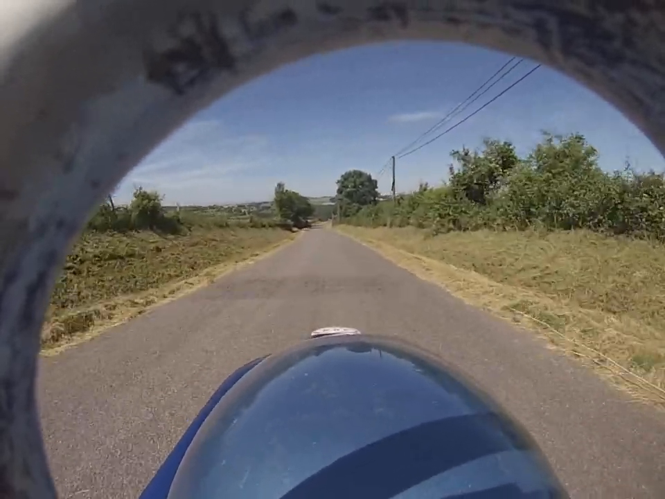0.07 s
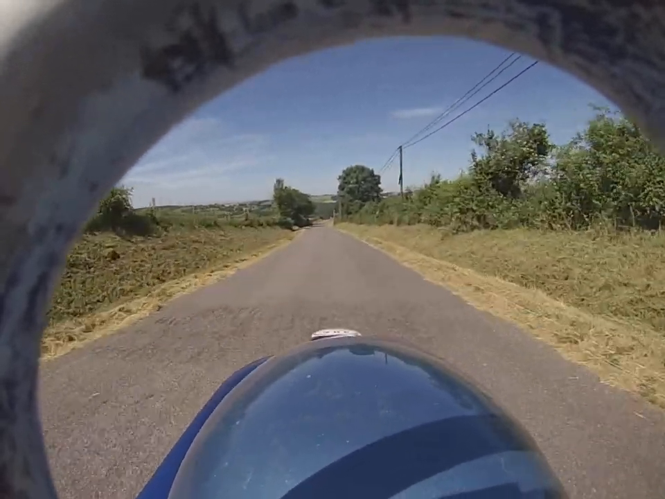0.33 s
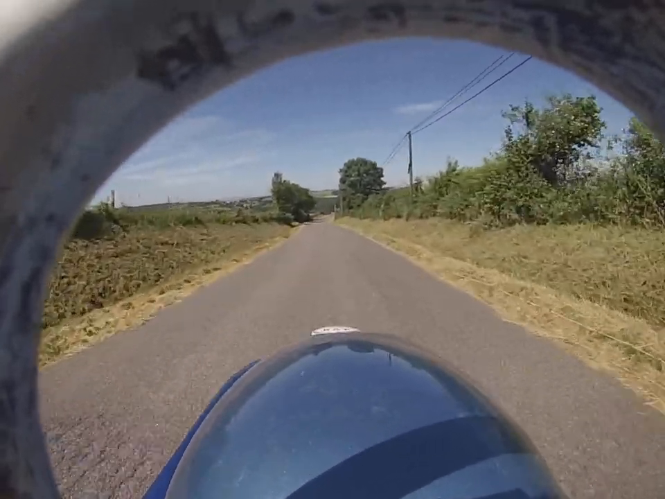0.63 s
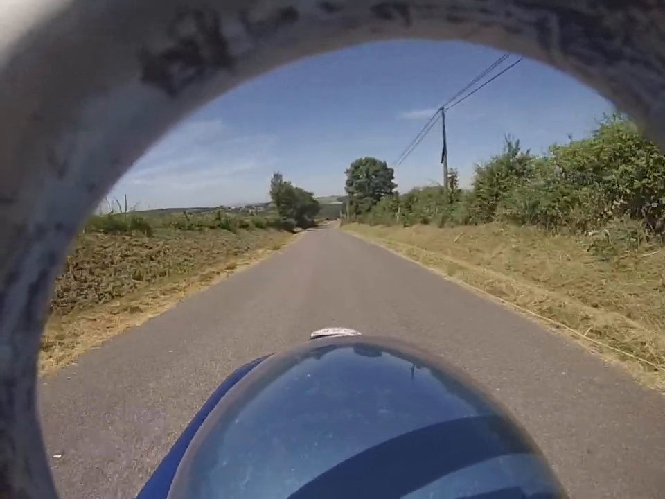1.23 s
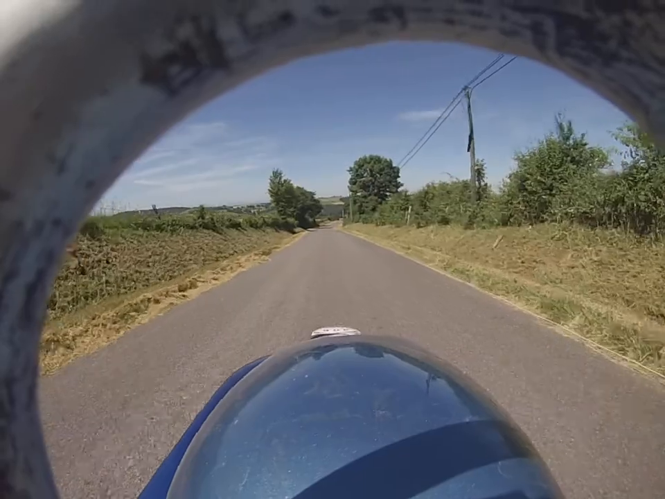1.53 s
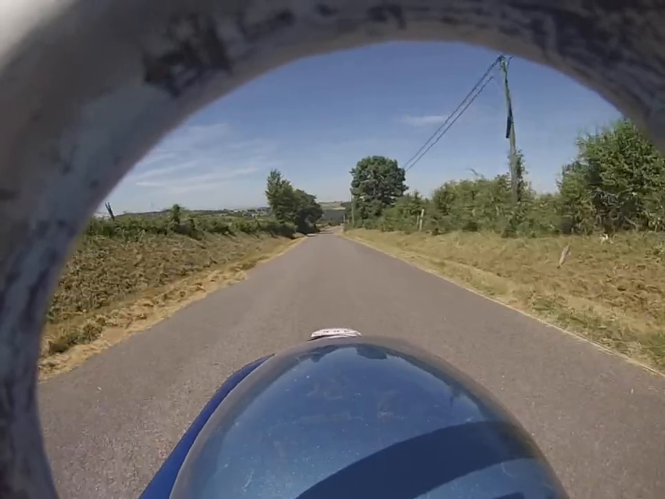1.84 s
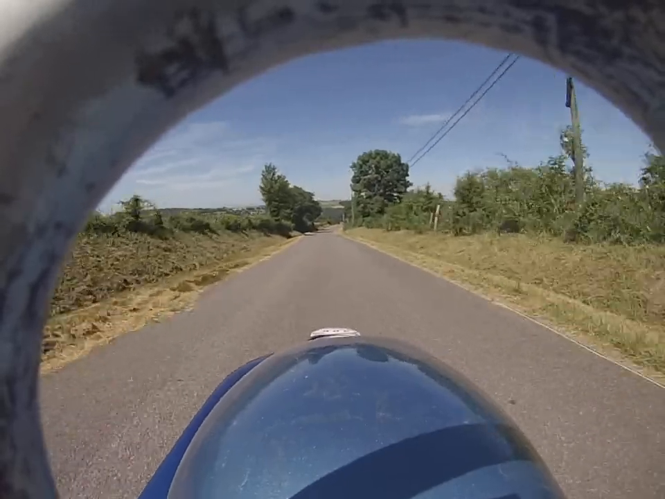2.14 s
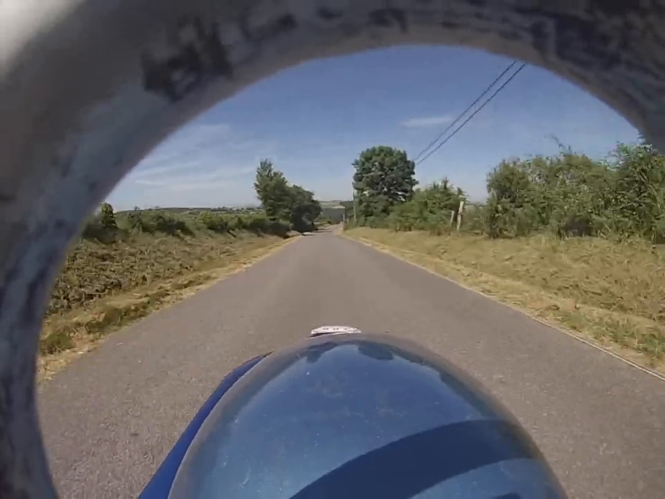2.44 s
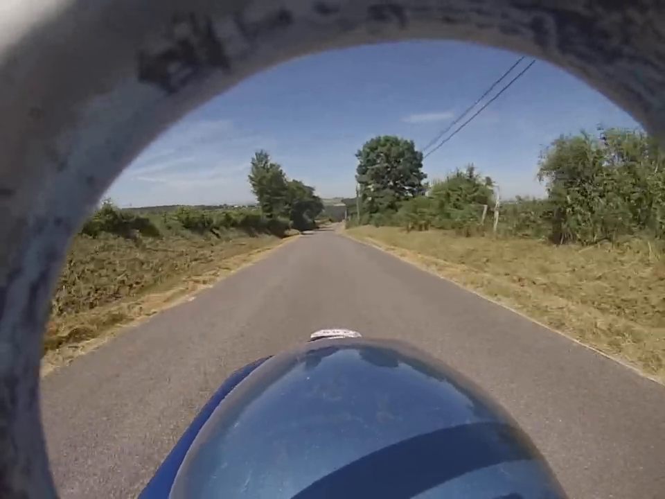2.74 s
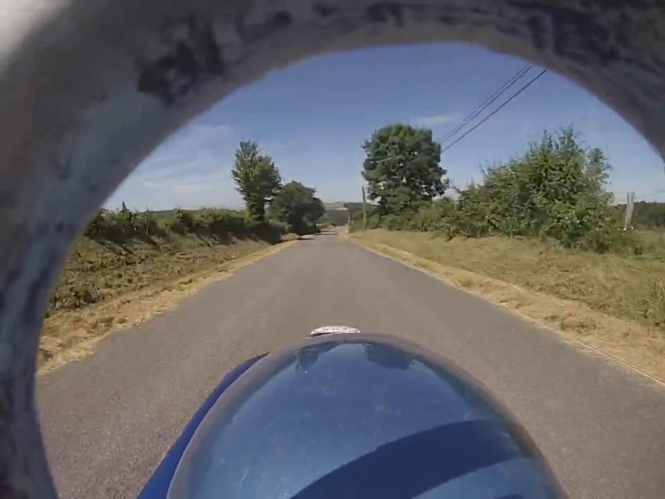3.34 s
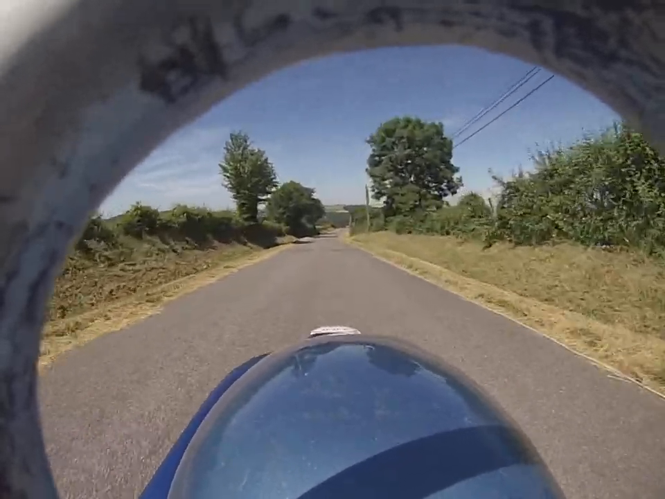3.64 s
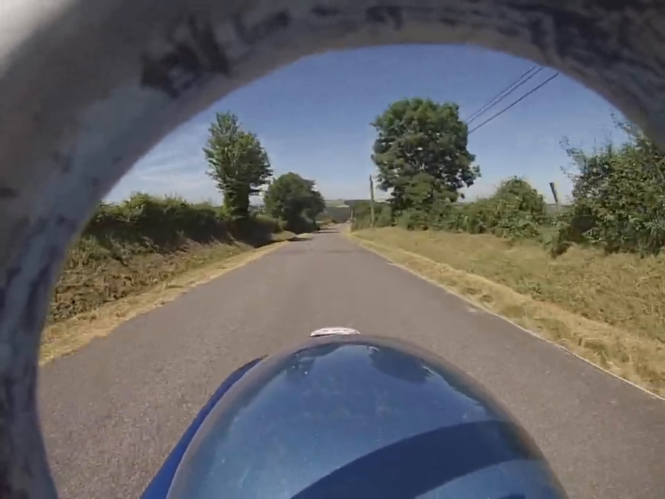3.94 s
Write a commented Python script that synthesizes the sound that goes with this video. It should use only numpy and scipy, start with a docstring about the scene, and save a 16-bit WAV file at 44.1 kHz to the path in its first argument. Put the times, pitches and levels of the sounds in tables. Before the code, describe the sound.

A small hollow cart rumbles and rattles along an asphalt road, heard from inside.

```python
"""The hollow shell of a small cart, booming on its wheels along an asphalt country road.
One microphone rides inside, close to the panels: road grit roars through them and air rushes past.
Bumps make the panels knock and loose fittings buzz, most on a rough patch that ends in a sharp click."""
import sys
import numpy as np
from scipy import signal
from scipy.fft import rfft, irfft
from scipy.io import wavfile
from scipy.ndimage import uniform_filter1d

SR = 44100
rng = np.random.default_rng(int(sys.argv[2]) if len(sys.argv) > 2 else 0)


def waveform_to_disk(signal):
    """Save audio, clipped to [-1, 1], as 16-bit WAV at the path in sys.argv[1]."""
    frames = np.transpose(np.atleast_2d(signal))
    scaled = np.clip(frames, -1, 1) * 32767
    samples = np.round(scaled).astype(np.int16)
    wavfile.write(sys.argv[1], SR, samples)


N = 176400
T = np.arange(N) / SR
BUMP_HZ = 33  # how fast the road's small bumps vary


def from_db(db):
    """Decibels to gain."""
    return 10 ** (np.asarray(db) / 20)


def rms_one(x):
    """Scale to unit rms."""
    return x / np.sqrt(np.mean(x ** 2) + 1e-20)


def level(rows):
    """Gain over time from (time_s, level_db) rows."""
    return from_db(np.interp(T, *np.transpose(rows)))


def drift(rate_hz):
    """A slow random wander with spread 1."""
    pole = np.exp(-80 * np.pi * rate_hz / SR)
    noise = rng.standard_normal(N // 40 + 2002)  # one value per 40 samples
    slow = signal.lfilter([1], [1, -2 * pole, pole * pole], noise)[2000:]
    return np.interp(np.arange(N) / 40, np.arange(len(slow)), rms_one(slow))


def colour(x, points):
    """Minimum-phase filter that follows (frequency_hz, gain_db) points."""
    hz, db = np.transpose(points)
    bins_hz = np.arange(N // 2 + 1) * SR / N
    gain = from_db(np.interp(np.log(bins_hz + 1), np.log(hz), db))
    cepstrum = irfft(np.log(gain))
    cepstrum[1:N // 2] *= 2
    cepstrum[N // 2 + 1:] = 0
    return irfft(rfft(x) * np.exp(rfft(cepstrum)))


def resonate(x, hz, width_hz):
    """A resonance with steep far skirts, at unit rms."""
    r = np.exp(-np.pi * width_hz / SR)
    ringing = signal.lfilter([1, 0, -1], [1, -2 * r * np.cos(2 * np.pi * hz / SR), r * r], x + 1e-18)
    skirt = np.clip(1.079 + 1.68 * width_hz / hz, 1.02, 1.5)
    band = signal.butter(2, [hz / skirt, hz * skirt], "band", fs=SR, output="sos")
    return rms_one(signal.sosfilt(band, ringing))


def ring(force, modes):
    """Every contact strikes each mode with a strength of its own; unit rms."""
    return rms_one(sum(from_db(db) * resonate(force * rng.standard_normal(len(force)), hz, width_hz)
                       for hz, width_hz, db in modes))


def contacts(per_s, spread_db):
    """Random contacts of uneven size."""
    return (rng.random(N) < per_s / SR) * from_db(spread_db * np.minimum(rng.exponential(1, N), 4))


def burst(modes, length_s):
    """A short run of contacts rings the modes; its loudest moment has unit rms."""
    force = np.exp(-(2 * T[:SR // 10] / length_s - 1) ** 4)
    ringing = ring(force, modes)
    return ringing / np.sqrt(uniform_filter1d(ringing ** 2, size=350).max())


def mix(events):
    """Lay (start_s, sound) pairs on one track."""
    track = np.zeros(N)
    for start_s, sound in events:
        i = int(start_s * SR)
        track[i:i + len(sound)] += sound[:N - i]
    return track


def sway(hz, width_hz, evenness):
    """A low mode shaken at random, with its swings partly evened."""
    swing = signal.hilbert(resonate(rng.standard_normal(N + SR), hz, width_hz))[SR:]
    return rms_one(swing.real / (abs(swing) + 0.62) ** evenness)


# Air passing outside: time_s, relative_db
AIR_LEVEL = [(0.0, -53), (0.37, -58), (0.54, -56), (0.68, -53.5), (0.86, -60.5), (1.24, -59), (2.06, -51),
             (2.7, -50.5), (3.68, -51), (4.0, -47.5)]
# Its spectrum from inside: frequency_hz, gain_db
AIR_SPECTRUM = [(1000, 4.5), (2600, 0), (3400, 12.5), (3950, 3), (4450, 3), (5250, -2.5), (5700, -12.5),
                (6400, -8), (7000, -21.5), (7700, -14.5), (9000, -26.5), (12000, -55), (16000, -69.5)]

def air():
    """A smooth rush of air and tyre hiss."""
    rush = rng.standard_normal(N) * from_db(drift(23))
    return from_db(3.5) * level(AIR_LEVEL) * rms_one(colour(rush, AIR_SPECTRUM))


# Single dry ticks on the shell: start_s, peak_db
TICKS = [(.7298, -40), (.7345, -40), (.744, -40), (.955, -39), (1.178, -43), (3.129, -35), (3.349, -33),
         (3.520, -35)]
# Short crunches: start_s, force_db
GRIT_CRUNCHES = [(.307, -37), (.666, -40), (.684, -37), (.7175, -37), (.768, -42), (3.821, -33.5)]
# Grit heard through the wall: frequency_hz, gain_db
GRIT_SPECTRUM = [(800, -9), (4200, -4), (8000, -12.5), (11000, -23), (15000, -38.5)]

def grit(crunch_s=0.005):
    """Specks of grit tick against the shell, singly or in short crunches."""
    strays = contacts(per_s=11, spread_db=2)
    force = from_db(-41.5) * strays / (strays.max() + 1e-9)
    force += mix((s, from_db([db])) for s, db in TICKS)
    for start_s, db in GRIT_CRUNCHES:
        specks = contacts(per_s=6000, spread_db=1.8) * rng.standard_normal(N)
        crunch = specks[:int(crunch_s * SR) + 1]
        force += mix([(start_s, from_db(db) * crunch / (abs(crunch).max() + 1e-9))])
    unit_tick = colour(signal.unit_impulse(N), GRIT_SPECTRUM)
    return colour(force, GRIT_SPECTRUM) / abs(unit_tick).max()


# Loose fittings around the microphone, in three groups: pitch_hz, width_hz, gain_db
FITTINGS_LOW = [(1294, 160, -3.5), (1903, 78, 1.5), (1998, 210, -6), (2309, 48, -3.5)]
FITTINGS_MID = [(2662, 83, 0.5), (2874, 76, 4.5), (3002, 43, 4.5), (3750, 220, -14)]
FITTINGS_HIGH = [(4390, 90, -2), (5305, 160, 2), (6140, 200, -7)]
# Their running chatter: time_s, relative_db
CHATTER_LEVEL = [(0, -35.5), (.25, -35), (.36, -42.5), (.49, -39.5), (.56, -35), (.8, -33.5), (.84, -44.5),
                 (1.1, -40), (1.5, -36.5), (2.05, -35.5), (2.8, -33.5), (3.15, -37.5), (3.5, -37.5),
                 (3.8, -35.5), (4, -37)]

def chatter(bumps):
    """Small bumps keep the loose fittings tapping."""
    taps = contacts(per_s=540, spread_db=1) * from_db(2 * bumps)
    groups = (FITTINGS_LOW, -1), (FITTINGS_MID, -10.5), (FITTINGS_HIGH, -30.5)
    return level(CHATTER_LEVEL) * sum(from_db(db) * ring(taps, modes) for modes, db in groups)


# The same fittings on larger bumps: start_s, length_s, low_db, mid_db, high_db
FITTING_BUZZES = [(0.024, 0.0034, -38, -35, -49), (0.137, 0.0065, -38, -35, -51),
                  (0.448, 0.012, -36, -36, -73.5), (0.515, 0.013, -26, -38, -59),
                  (0.546, 0.0079, -28.5, -38, -58), (0.564, 0.015, -24.5, -30, -45.5),
                  (0.606, 0.0018, -31, -36, -58), (0.662, 0.018, -27.5, -25, -49.5),
                  (0.684, .007, -33, -40, -53), (0.703, 0.0085, -20, -34, -64),
                  (0.74, 0.0069, -32, -51, -65), (0.76, 0.01, -21, -32, -55),
                  (0.779, .012, -24.5, -39, -54), (0.869, 0.0072, -34, -32, -53),
                  (0.894, 0.0085, -39.5, -39.5, -63), (1.357, 0.015, -24.5, -38, -67),
                  (1.578, 0.01, -27.5, -30.5, -53), (2.016, 0.0064, -24.5, -52, -63),
                  (2.095, 0.023, -39.5, -34.5, -59), (2.255, 0.025, -24, -37.5, -61),
                  (2.481, 0.018, -23.5, -39.5, -67), (2.596, 0.0091, -42, -31, -63),
                  (2.662, 0.0083, -25.5, -36, -60), (2.712, 0.0092, -27, -38, -59),
                  (2.822, 0.011, -36, -32.5, -55), (3.291, 0.015, -27.5, -36, -51),
                  (3.821, 0.012, -25.5, -30.5, -40.5)]

def buzzes():
    """A bump shakes all three groups of fittings into a brief buzz."""
    return mix((start_s, from_db(db) * burst(modes, length_s))
               for start_s, length_s, *group_db in FITTING_BUZZES
               for modes, db in zip((FITTINGS_LOW, FITTINGS_MID, FITTINGS_HIGH), group_db))


# Seams passing underneath: start_s, level_db
SEAMS = [(0.105, -19.5), (.563, -21), (0.662, -26), (.708, -26.5), (2.055, -21), (2.37, -21), (3.294, -23),
         (3.896, -29)]
# The frame's modes: pitch_hz, width_hz, gain_db
FRAME = [(150, 87, -4.5), (203, 220, -7), (254.5, 76, 7.5), (327, 220, -1)]

def thumps():
    """The wheels cross seams in the road and thump the frame."""
    return mix((s, from_db(db) * burst(FRAME, length_s=0.0072)) for s, db in SEAMS)


# Hard raps, all around the microphone: start_s, level_db
SHELL_RAPS = [(.026, -27), (0.13, -31), (.610, -27), (.708, -19), (0.7668, -23), (.771, -19), (0.7934, -21),
              (1.857, -26.5), (1.901, -30), (1.934, -29.5), (2.378, -29), (2.532, -24.5), (2.567, -25.5),
              (3.823, -21)]
# The rapped shell's modes: pitch_hz, width_hz, gain_db
SHELL_MODES = [(1285, 310, 3), (1606, 66, -3), (2230, 250, 5.5), (2700, 150, -6), (3550, 870, -12.5)]

def raps():
    """Very short contacts ring the whole shell."""
    return mix((s, from_db(db) * burst(SHELL_MODES, length_s=0.001)) for s, db in SHELL_RAPS)


# A panel knocking close by: start_s, relative_db
PANEL_KNOCKS = [(0.0227, -14), (0.167, -21.5), (0.289, -18.5), (0.666, -15.5), (0.7051, -20),
                (0.7648, -15.5), (0.7919, -21.5), (0.9749, -22), (1.239, -19.5), (1.3618, -17.5),
                (1.487, -21.5), (1.703, -14.5), (1.933, -16), (1.964, -21), (2.042, -15), (2.128, -12),
                (2.1795, -18), (2.4728, -18), (2.5577, -13), (2.858, -14), (2.8756, -16.5), (2.8924, -16),
                (2.9724, -14.5), (3.027, -19), (3.104, -19), (3.2033, -16.5), (3.322, -21), (3.6155, -17),
                (3.67, -17.5), (3.851, -14.5), (3.969, -25)]
# Its modes: pitch_hz, width_hz, gain_db
KNOCKING_PANEL = [(1174, 95, 3.5), (1237, 41, -2), (1430, 370, -17), (2120, 400, -9.5)]

def knocks():
    """Each larger bump knocks the panel with a short run of contacts."""
    return mix((s, from_db(db - 4.5) * burst(KNOCKING_PANEL, length_s=0.0059)) for s, db in PANEL_KNOCKS)


# Tyres on asphalt, from inside: time_s, relative_db
ROAR_LEVEL = [(0, -27), (.22, -25.5), (.3, -30), (.68, -24), (.73, -34.5), (.88, -35.5), (1.1, -28.5),
              (1.46, -25.5), (1.57, -29.5), (1.65, -27), (2.05, -23), (2.38, -22.5), (2.42, -20),
              (2.46, -23), (2.63, -22.5), (3.2, -26), (3.3, -23), (3.4, -25.5), (3.7, -24.5), (3.8, -22.5),
              (4, -24)]
# Panel modes driven by the road: pitch_hz, width_hz, gain_db
PANEL_MODES = [(699, 53, -5), (805.3, 52, -6), (863.5, 48, 0.5), (1143, 58, -6.5), (1281, 59, -12.5)]

def tyres(bumps):
    """Road grit roars through the panels; small bumps set the knocking panel pattering."""
    roar = ring(contacts(per_s=2500, spread_db=4.5) * from_db(0.43 * bumps), PANEL_MODES)
    patter = ring(contacts(per_s=540, spread_db=1) * from_db(4 * bumps), KNOCKING_PANEL)
    return level(ROAR_LEVEL) * (from_db(-0.32) * roar + from_db(-11.5) * patter)


# Close clicks at the end of the rough patch: start_s, peak_db
SHELL_CLICKS = [(0.8107, -6.5), (0.8197, -25)]
# Their spectrum: frequency_hz, gain_db
CLICK_SPECTRUM = [(250, -7), (700, 0.5), (950, -6), (1150, 8.5), (1600, -9), (2400, -1.5), (3300, -12),
                  (4550, -16), (5200, -16.5), (7000, -23.5), (9500, -35), (15000, -44)]

def clicks(tail_db=-13, t60_s=0.02):
    """Hard contacts: a crack and a brief scatter inside the shell."""
    events = []
    for start_s, db in SHELL_CLICKS:
        hit = from_db(tail_db - 60 * np.minimum(T / t60_s, 10)) * rng.standard_normal(N)
        hit[0] = 1  # the crack
        click = colour(hit, CLICK_SPECTRUM)[:SR // 10]
        events.append((start_s, from_db(db) * click / abs(click).max()))
    return mix(events)


# The frame under the microphone: time_s, relative_db
RUMBLE_LEVEL = [(0.0, -26), (0.18, -26.5), (0.5, -30.5), (0.56, -25), (0.88, -33), (2.16, -25),
                (3.5, -28.5), (4.0, -26.5)]
# Its spectrum: frequency_hz, gain_db
RUMBLE_SPECTRUM = [(15, 0.5), (55, 4), (78, 9), (105, -3), (130, -0.5), (175, -2), (200, 3), (222, 1),
                   (252, 3), (320, 0), (360, -7.5), (410, -3.5), (490, -8), (560, -3), (700, -5.5),
                   (1000, -10.5), (1500, -18), (2500, -29.5), (4000, -71)]

def rumble():
    """The frame rumbles, swelling with small bumps."""
    shaking = rng.standard_normal(N) * from_db(1.9 * drift(BUMP_HZ))
    return from_db(3) * level(RUMBLE_LEVEL) * rms_one(colour(shaking, RUMBLE_SPECTRUM))


# Dips in the shell's response at the microphone: frequency_hz, width_hz
CAVITY_DIPS = [(1020, 33), (4830, 370)]

def cavity(sound):
    """The cavity of the shell cancels a few narrow bands."""
    for hz, width_hz in CAVITY_DIPS:
        sound = signal.lfilter(*signal.iirnotch(hz, hz / width_hz, fs=SR), sound)
    return sound


# The rough patch of road: centre_s, envelope_db
ROUGH_PATCH = [(0.669, -26), (0.713, -15), (0.809, -9)]

def jolts(pitch_hz=44, half_width_s=0.011):
    """Each jolt throws the whole shell up and down once."""
    return sum(from_db(db) * np.exp(-((T - s) / half_width_s) ** 2)
               * np.sin(2 * np.pi * pitch_hz * (s - T)) for s, db in ROUGH_PATCH)


# The shell's bounce, and the boom of the air around the microphone: time_s, level_db
BOUNCE_LEVEL = [(0, -14.5), (.05, -11), (.16, -15), (.25, -19.5), (.31, -9), (.4, -17.5), (.55, -18.5),
                (.69, -7.5), (.76, -17.5), (1.05, -16.5), (1.17, -12), (1.27, -21.5), (1.44, -8),
                (1.56, -14.5), (1.68, -14), (1.83, -24), (2.1, -14), (2.33, -14), (2.4, -11.5), (2.55, -13),
                (2.85, -14.5), (2.97, -13.5), (3.11, -8), (3.2, -21), (3.36, -9.5), (3.46, -17),
                (3.52, -12), (3.61, -25.5), (3.71, -11), (3.88, -14.5), (4, -12.5)]
BOOM_LEVEL = [(0, -20), (.22, -19), (.46, -21), (.59, -14), (.76, -27), (.93, -31.5), (1.0, -27),
              (1.16, -18.5), (1.25, -27), (1.58, -23), (1.68, -19.5), (1.85, -22.5), (2.03, -16.5),
              (2.12, -26), (2.2, -14), (2.3, -17.5), (2.44, -16), (2.64, -27.5), (2.7, -17), (2.85, -22),
              (2.96, -16.5), (3.1, -30), (3.28, -27), (3.55, -16), (4, -25.5)]

def shell():
    """The shell bounces on its wheels and the air in it booms."""
    bounce = level(BOUNCE_LEVEL) * sway(hz=33.5, width_hz=14.8, evenness=0.73)
    boom = level(BOOM_LEVEL) * sway(hz=75.2, width_hz=12.2, evenness=0.65)
    return bounce + boom


def scene():
    """Everything at one microphone inside the shell."""
    low_end = shell() + rumble() + jolts()
    bumps = drift(BUMP_HZ)
    rolling = tyres(bumps) + chatter(bumps)
    impacts = thumps() + knocks() + raps() + buzzes()
    return (low_end + cavity(rolling + impacts + air()) + clicks() + grit())[None]


def record(dry, ceiling=0.9, cutoff_hz=15700):
    """The highest peaks are rounded and the top treble is cut."""
    rounded = dry / (1 + (dry / ceiling) ** 8) ** (1 / 8)
    return signal.sosfilt(signal.cheby2(12, 70, cutoff_hz, fs=SR, output="sos"), rounded)


dry = scene()
out = record(dry)
waveform_to_disk(out)
```